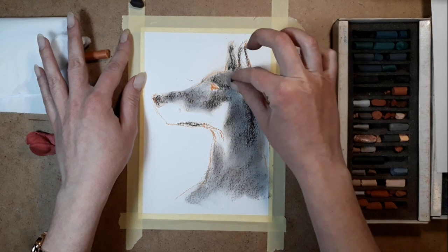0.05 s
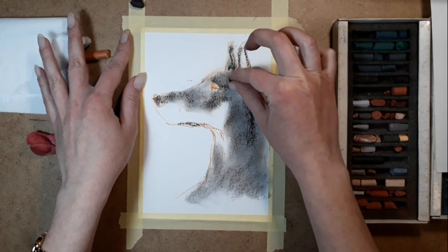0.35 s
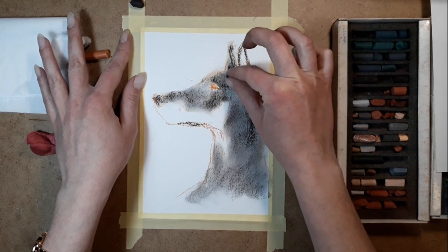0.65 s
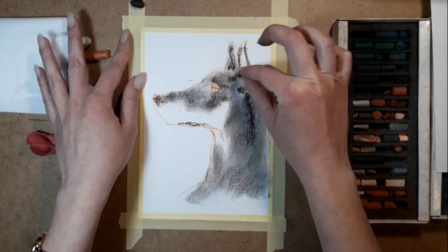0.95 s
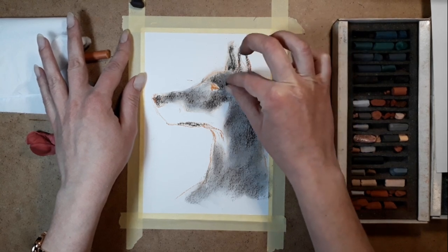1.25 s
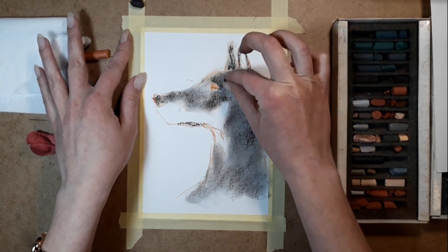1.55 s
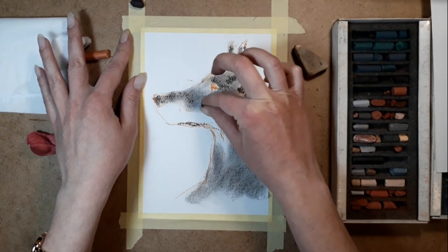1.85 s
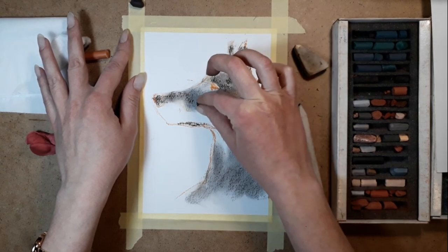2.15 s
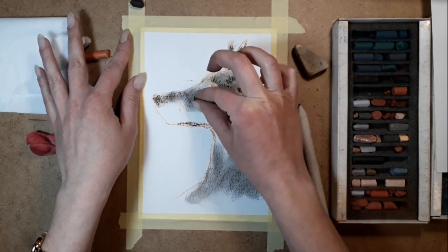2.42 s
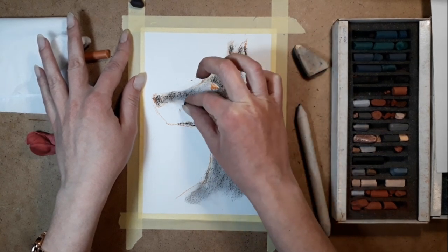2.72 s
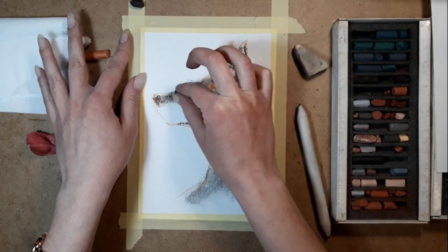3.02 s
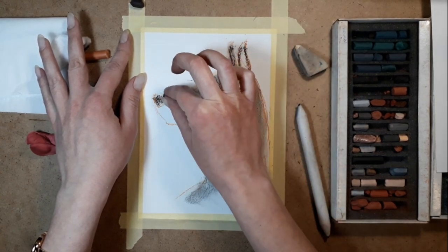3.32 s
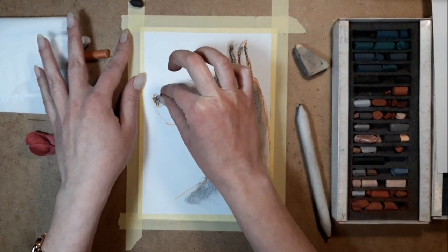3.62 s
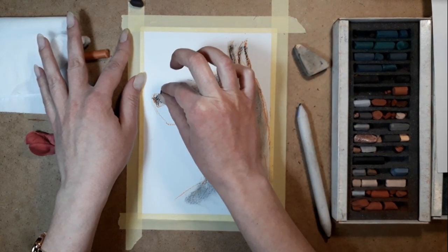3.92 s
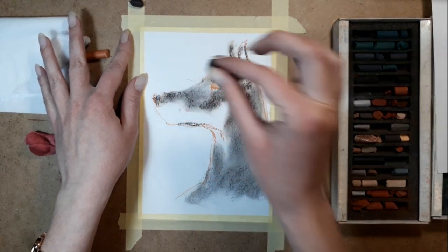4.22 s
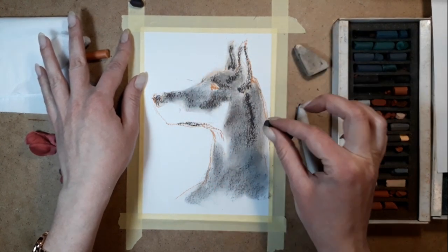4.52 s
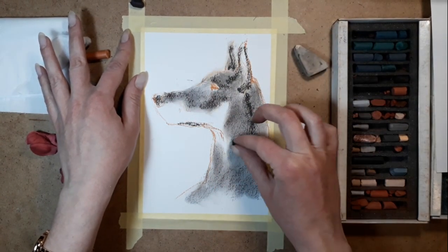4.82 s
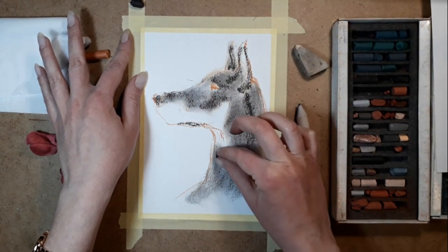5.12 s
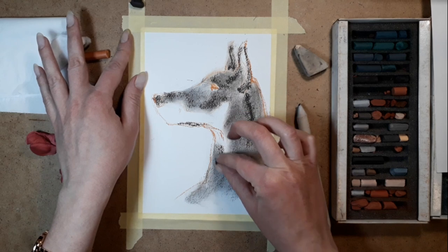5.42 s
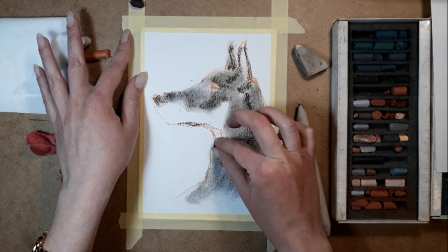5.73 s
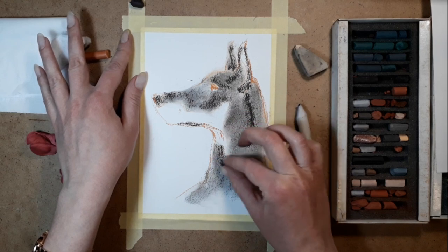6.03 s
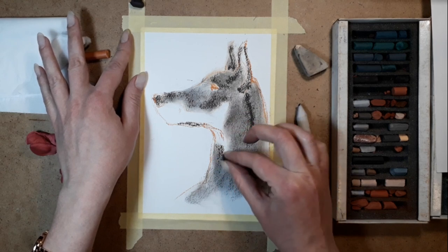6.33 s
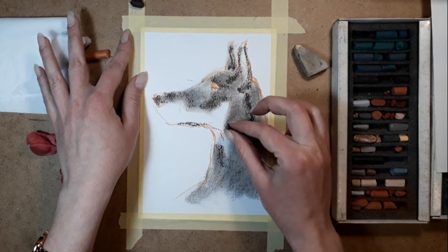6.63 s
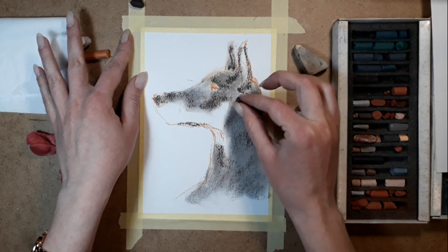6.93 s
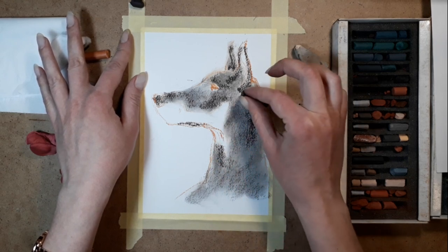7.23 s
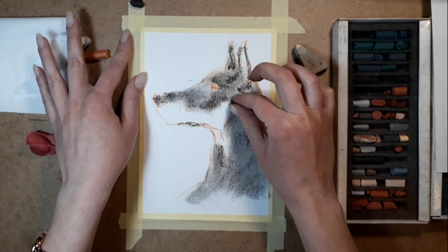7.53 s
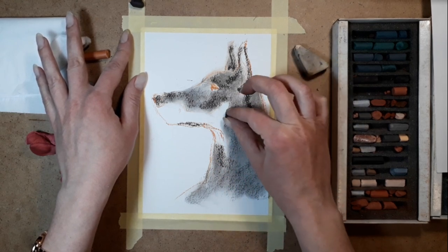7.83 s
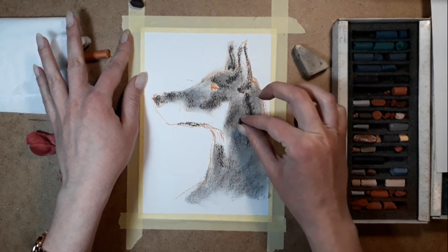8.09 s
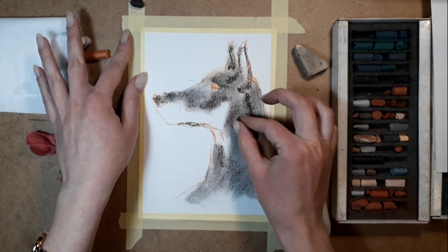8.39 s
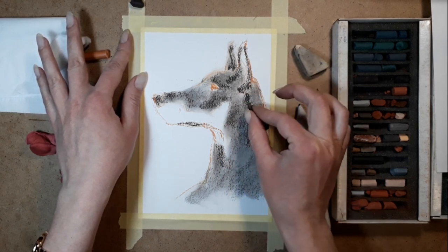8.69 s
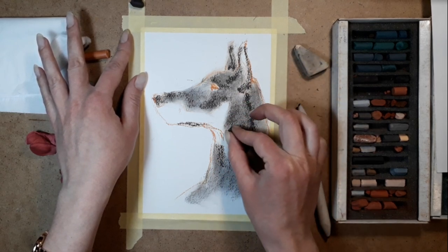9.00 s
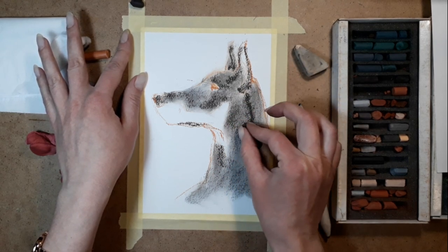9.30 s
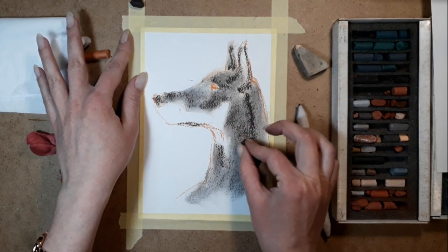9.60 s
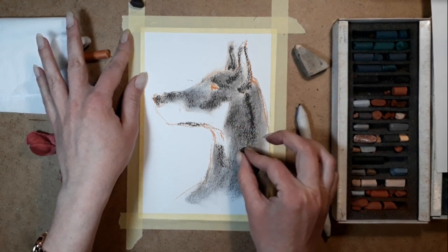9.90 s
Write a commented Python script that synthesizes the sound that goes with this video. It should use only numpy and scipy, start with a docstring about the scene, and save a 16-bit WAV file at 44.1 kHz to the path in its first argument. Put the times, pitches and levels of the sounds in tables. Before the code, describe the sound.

A stub of soft pastel is rubbed in short, quick strokes on rough paper taped to a board, close to the microphone. Each stroke has a dry rasp and a powdery hiss, with occasional light taps and ticks. About halfway through, the strokes get louder and a muffled vehicle accelerates outside, rising in pitch as it draws nearer. The small room hums faintly underneath.

```python
"""Over the faint hum of a small room, a stub of soft pastel is rubbed in short strokes on rough paper
taped to a board. The paper's tooth catches the chalk: the board rasps and crumbling pigment hisses,
with a tap as the stub lands and a tick as its edge breaks. From halfway on the strokes get louder and a
motor vehicle accelerates outside, drawing nearer, its climbing tones swelling on the room's resonances."""
import sys
import numpy as np
from scipy import signal
from scipy.fft import rfft, irfft, next_fast_len
from scipy.io import wavfile
from scipy.ndimage import uniform_filter1d

SR = 44100
rng = np.random.default_rng(int(sys.argv[2]) if len(sys.argv) > 2 else 0)


def put_to_file(sound):
    """Save the sound as 16-bit audio at rate SR, in the file named by the first command-line argument."""
    columns = np.atleast_2d(sound).T  # one column per channel
    safe = np.clip(columns, -1, 1)
    whole_steps = np.round(safe * 32767)
    wavfile.write(sys.argv[1], SR, whole_steps.astype(np.int16))


N = 438794
T = np.arange(N) / SR

# strokes of the chalk: (start [s], length [s], relative rasp level [dB], hiss offset [dB])
STROKES = [(0.18, 0.12, -55.5, -14.5), (0.312, 0.098, -54.5, -14), (0.444, 0.091, -52, -14.5),
           (0.576, 0.078, -55.0, -14), (0.678, 0.09, -55, -12.5), (0.794, 0.09, -51, -10.5),
           (1.166, 0.053, -56, -17), (1.251, 0.092, -56.5, -13.5), (1.37, 0.089, -57, -13),
           (1.476, 0.092, -57, -15), (1.573, 0.1, -54, -16), (1.684, 0.057, -51.5, -10.5),
           (2.033, 0.042, -65.5, -1), (2.077, 0.085, -56, -9.5), (2.184, 0.1, -51, -11),
           (2.298, 0.081, -51.5, -6), (2.747, 0.067, -57.5, -9.5), (2.844, 0.069, -52, -12),
           (2.936, 0.031, -68.5, 10), (3.197, 0.092, -49.5, -14.5), (3.392, 0.074, -56.5, -18),
           (3.531, 0.11, -60.5, -17), (3.661, 0.053, -61, -15), (3.753, 0.065, -63, -18),
           (3.859, 0.05, -56.5, -17), (3.949, 0.06, -60, -15), (4.047, 0.069, -49, -10),
           (4.286, 0.24, -91, 15.5), (4.971, 0.12, -57.5, 8), (5.04, 0.18, -57, -13),
           (5.167, 0.24, -50.0, -12), (5.428, 0.19, -44.5, -7.5), (5.608, 0.22, -46.5, -8.5),
           (5.85, 0.16, -44, -9), (5.988, 0.11, -45.0, -9.5), (6.098, 0.088, -41.5, -11),
           (6.187, 0.092, -45.0, -7), (6.293, 0.07, -46.0, -11), (7.633, 0.14, -56.5, -8.5),
           (7.714, 0.23, -49.5, -14.5), (7.89, 0.142, -51.5, -10), (7.979, 0.13, -43.5, -7.5),
           (8.32, 0.097, -52, -11.5), (8.45, 0.079, -47, -5.5), (8.538, 0.1, -45, -7.5),
           (8.672, 0.092, -41, -7.5), (8.952, 0.086, -51.5, 2), (9.016, 0.077, -44.5, -12.5),
           (9.093, 0.1, -43.5, -9), (9.21, 0.09, -42.5, -10), (9.315, 0.092, -42.5, -10),
           (9.42, 0.11, -43.5, -5), (9.642, 0.1, -45.5, -10), (9.751, 0.068, -47, -10.5),
           (9.834, 0.1, -42, -8)]
# modes of the board with its paper: (frequency [Hz], width [Hz], gain [dB])
BOARD_MODES = [(505, 89, 3), (661, 67, -7), (907, 87, -2), (1158, 59, 3.5), (1342, 64, 9), (1448, 170, 1.5),
               (1695, 126, -1.5), (1995, 84, 1), (2324, 200, -16.5), (2820, 190, -6.5), (3300, 81, -12.5),
               (3650, 170, -25), (4520, 510, -25)]


def rubbing(rasp_db=2.02, hiss_db=2.76):
    """Each stroke speeds up and slows in a half sine; a faster stub meets more fibres, sheds more dust."""
    speed, rasp_power, hiss_power = np.zeros((3, N))
    for start, length, db, hiss_offset_db in STROKES:
        span = slice(int(start * SR), int((start + length) * SR))
        arc = np.sin(np.pi * np.clip((T[span] - start) / length, 0, 1))
        speed[span] = np.maximum(speed[span], arc)
        rasp_power[span] += (arc ** 0.91 * undb(db)) ** 2
        hiss_power[span] += (arc ** 1.14 * undb(db + hiss_offset_db)) ** 2
    slips = catches(1200 + 3500 * speed, spread_db=2.5)
    dust = catches(2500 + 9000 * speed, spread_db=5.5)
    grip = undb(1.1 * walk(110))  # the pressure trembles over the paper's grain
    rasp = steady(board(slips, mode_shares())) * np.sqrt(rasp_power) * undb(rasp_db)
    # hiss of crumbling pigment: (frequency [Hz], relative level [dB])
    crumble_eq = [(1200, -34.5), (2800, -6), (4400, 3), (5700, -0.5), (7300, 7), (8600, 8.5), (9800, -1),
                  (11000, -5.5), (13500, -0.5), (15800, -3.5)]
    hiss = steady(colour(0.83 * slips + dust, crumble_eq)) * np.sqrt(hiss_power) * undb(hiss_db)
    return grip * (rasp + hiss)


def catches(per_second, spread_db):
    """Chalk snags on single paper fibres: many tiny slips, a few big ones."""
    slips = rng.random(N) < per_second / SR
    size = undb(spread_db * np.minimum(rng.standard_normal(N), 2.5))
    return unit(slips * size * rng.choice([-1, 1], N) / np.sqrt(per_second))


def board(push, shares_db):
    """The board rings in its modes, each with its own boost or cut."""
    ring = sum(undb(db + share) * resonate(push, hz, width)
               for (hz, width, db), share in zip(BOARD_MODES, shares_db))
    return signal.sosfilt(signal.butter(2, 6500, fs=SR, output="sos"), ring)


def mode_shares(usual_hiss_db=-9.5, roam_db=4.5):
    """Hissier strokes run on the stub's edge and ring brighter; the spot touched colours every mode."""
    hiss_db, = curves(sorted((start + length / 2, offset) for start, length, _, offset in STROKES))
    tilt = 4 * np.tanh((hiss_db - usual_hiss_db) / 4)  # dB per octave
    # the board booms more at some spots of the drawing: (time [s], gain of the lowest modes [dB])
    boom_curve = [(0, -1.5), (2.3, 3), (3.75, 7), (4.1, -5.5), (6.2, -3.5), (8.7, 3)]
    boom_db, = curves(boom_curve)
    return [tilt * np.clip(np.log2(hz / 1400), -.3, 1.3) + boom_db * (hz < 750) + roam_db * walk(7.9)
            for hz, _, _ in BOARD_MODES]


def taps(contact_hz=1600):
    """A cushioned blow drives only the board's lower modes, with a dull knock from the table below."""
    # the stub or a fingertip knocks the board: (time [s], relative level [dB])
    blows = [(1.1788, -40), (2.05, -45.5), (2.7219, -42), (2.7252, -30.5), (3.239, -44), (4.09, -47),
             (5.635, -44), (5.9236, -48), (5.935, -46)]
    push = np.zeros(N)
    for s, db in blows:
        push[int(s * SR)] += undb(db)
    push = signal.sosfilt(signal.butter(4, contact_hz, fs=SR, output="sos"), push)
    ring = board(push, np.zeros(len(BOARD_MODES))) * undb(30)
    knock = resonate(push, hz=720, width=500) * undb(28.5)
    return ring + knock


def ticks(width_hz=3200):
    """A brief crunch as an edge of the chalk breaks."""
    # the hard edge clicks on the paper: (time [s], relative level [dB], centre [Hz], decay [s])
    clicks = [(0.118, -57, 5900, 0.0034), (1.166, -55.5, 7000, .004), (1.543, -48, 3770, 0.0016),
              (2.037, -62, 7000, .005), (2.711, -47, 5440, 0.0024), (3.166, -56, 7000, 0.0043),
              (3.201, -45, 6660, 0.0098), (4.101, -42.5, 7000, 0.0018), (4.983, -44.5, 5800, 0.01),
              (5.623, -48, 4000, 0.0017), (7.278, -48, 3900, 0.0025), (7.30, -52.5, 3800, 0.0026),
              (8.305, -54, 5997, 0.0048), (8.964, -37.5, 5400, 0.0063), (9.651, -41, 5700, .004)]
    out = np.zeros(N)
    age = T[:SR // 10]
    for s, db, hz, decay in clicks:
        burst = rng.standard_normal(len(age)) * np.exp(-age / decay)
        crunch = resonate(resonate(burst, hz, width_hz), hz, width_hz)
        start = int(s * SR)
        out[start:start + len(age)] += undb(db) * 2 * crunch
    return out


def room(x, t60=0.39, wet_db=-10, dull_hz=3000):
    """The hands, small as they are, throw back only treble; nearby walls add a short, dull tail."""
    # short echoes off the hands: (delay [s], gain [linear])
    bounces = [(.0009, 0.41), (.0021, -.28), (.0034, .25)]
    age = T[:SR // 2]
    tail = rng.standard_normal(len(age)) * np.exp(-np.log(1000) * age / t60) * (age > .004)
    tail = signal.lfilter(*signal.butter(1, dull_hz, fs=SR), tail / np.linalg.norm(tail))
    treble = signal.lfilter(*signal.butter(2, 3500, "high", fs=SR), x)
    early = sum(gain * np.interp(T - delay, T, treble, left=0) for delay, gain in bounces)
    return undb(-1.65) * (x + early) + undb(wet_db) * signal.fftconvolve(x, tail)[:N]


def vehicle(engine_db=-39.5, roar_db=-50):
    """A vehicle revs up as it draws near: engine tones over a dull roar."""
    # engine speed: (time [s], firing rate [Hz])
    revs = [(4.8, 89.9), (5.5, 105.2), (6.0, 118.2), (6.5, 129.4), (7.0, 139.6), (7.6, 151.9), (8.3, 167.4),
            (8.9, 188.8), (9.5, 208), (9.95, 231.6)]
    # nearness of the vehicle: (time [s], gain [dB])
    approach = [(4.7, -41), (5.3, -18), (5.7, -8), (6.2, -6.5), (7.3, -6.5), (7.7, -6), (8.2, -2.5),
                (8.9, 0), (9.95, 6.5)]
    # load on the engine, heard in the strength of its tones: (time [s], gain [dB])
    load = [(4.8, 3), (5.3, 4), (5.8, 2), (7.45, -1), (7.65, 7.5), (7.95, -0.5), (8.9, 2), (9.95, -2)]
    rate, = curves(revs)
    near_db, = curves(approach)
    load_db, = curves(load)
    phase = 2 * np.pi * np.cumsum(rate * (1 + 0.0044 * walk(19.5))) / SR
    tones = engine_tones(rate, phase) * undb(engine_db + load_db)
    roar = street_roar(phase) * undb(roar_db + 2.0 * walk(3.99))
    return undb(near_db) * (tones + roar)


def engine_tones(rate, phase, blur_hz=1100, least_blur=0.23, waver_db=2.2):
    """Engine orders climb through the room's resonances; street echoes blur the higher ones most."""
    # engine orders: (multiple of the firing rate, relative level [dB])
    orders = [(1, -2), (1.5, -12.5), (2, -4), (2.5, -16), (3, -8.5), (3.5, -18), (4, -11), (4.5, -13),
              (5, -13.5)]
    tones = 0
    for order, db in orders:
        blur = least_blur + order * rate / blur_hz
        echoes = (1 + blur * (walk(26.2) + 1j * walk(34))) / np.sqrt(1 + 2 * blur ** 2)
        tone = np.sqrt(2) * np.real(echoes * np.exp(1j * (order * phase + 2 * np.pi * rng.random())))
        tones = tones + tone * undb(db + waver_db * walk(4.8)) * room_gain(order * rate)
    return tones


def room_gain(pitch, floor_db=-14.5):
    """How strongly the room answers a tone from outside: loud on a resonance, weak between them."""
    # room resonances: (frequency [Hz], width [Hz], gain [dB])
    room_modes = [(128.3, 5.9, 4), (139, 4.3, 2.5), (148.5, 9.3, -1), (172.8, 11, 4), (188.7, 3.5, 3),
                  (209.2, 23.5, 0.5), (240, 51, -5.5), (281.8, 25.7, 5), (304.9, 7.7, 6.5),
                  (313.4, 16.6, 5.5), (385, 26.8, 4.5), (438, 41, -8.5), (484, 18, -2), (626, 26, -8.5)]
    f = np.arange(1500.)
    power = sum((undb(db) / (1 + (2 * (f - hz) / width) ** 2)) ** 2 for hz, width, db in room_modes)
    return np.interp(pitch, f, np.sqrt(power + undb(floor_db) ** 2))


def street_roar(phase):
    """Exhaust and road noise, pulsing with each firing and muffled by the walls."""
    # the roar as heard indoors: (frequency [Hz], relative level [dB])
    roar_eq = [(60, -26), (120, -15.5), (200, -2.5), (400, -1.5), (520, -8.5), (750, -16), (1050, -14),
               (1250, -16.5), (1500, -22.5), (2600, -29), (4500, -38), (9000, -44.5)]
    # resonances of the path from the street: (frequency [Hz], width [Hz], gain [dB])
    leaks = [(896, 100, -1.5), (1917, 42, 7)]
    pulsing = rng.standard_normal(N) * (1 + .5 * np.sin(phase))
    roar = unit(colour(pulsing, roar_eq))
    return roar + sum(undb(db) * resonate(roar, hz, width) for hz, width, db in leaks)


def room_tone():
    """Low room noise and a wavering appliance hum."""
    # the still room: (frequency [Hz], relative level [dB])
    air_eq = [(15, -76.5), (25, -46.5), (59, -10.5), (93, -13.5), (198, -5.5), (260, -10.5), (313, -1.5),
              (399, -20), (433, -14), (523, -20), (684, -20.5), (1240, -24.5), (1380, -26), (2120, -31),
              (7000, -40.5), (15500, -44)]
    # appliance hum: (frequency [Hz], level [dB])
    hum_tones = [(70, -73), (204.6, -71.5), (312.2, -67)]
    air = unit(colour(rng.standard_normal(N), air_eq)) * undb(-57.5 + .5 * walk(2.7))
    hum = 0
    for hz, db in hum_tones:
        level = undb(db) * (1 + .5 * walk(8.1))
        hum = hum + level * np.sqrt(2) * np.sin(2 * np.pi * hz * T + 1.18 * walk(9.7))
    return air + hum


def undb(db):
    """Decibels to gain."""
    return 10 ** (np.asarray(db) / 20)


def unit(x):
    """Scale to rms 1."""
    return x / np.sqrt(np.mean(x ** 2))


def steady(x, seconds=0.076):
    """Hold the short-term rms at 1, keeping the grain."""
    return x / np.sqrt(uniform_filter1d(x ** 2, int(seconds * SR)) + 1e-12)


def curves(table):
    """The columns of a timed table, joined by straight lines."""
    s, *columns = np.transpose(table)
    return [np.interp(T, s, c) for c in columns]


def walk(rate):
    """Smooth random drift with rms 1, changing about rate times a second."""
    window = max(int(SR / rate), 2)
    drift = uniform_filter1d(rng.standard_normal(N), window, mode="wrap")
    return unit(uniform_filter1d(drift, window, mode="wrap"))


def colour(x, points):
    """Minimum-phase EQ through the points (frequency [Hz], gain [dB])."""
    hz, db = np.transpose(points)
    size = next_fast_len(N + SR // 2, True)
    f = np.maximum(np.arange(size // 2 + 1) * SR / size, 1)
    gain = undb(np.interp(np.log(f), np.log(hz), db))
    cepstrum = irfft(np.log(gain), size)
    cepstrum[1:size // 2] *= 2
    cepstrum[size // 2 + 1:] = 0
    return irfft(rfft(x, size) * np.exp(rfft(cepstrum)), size)[:N]


def resonate(x, hz, width):
    """One resonance, gain 1 at its centre."""
    return signal.lfilter(*signal.iirpeak(min(hz, .45 * SR), hz / width, fs=SR), x)


def scene():
    """The drawing up close, the street beyond the walls, room tone underneath; mono."""
    drawing = room(rubbing() + taps() + ticks())
    return (drawing + vehicle() + room_tone())[None]


def record(dry):
    """The microphone has a broad dip in the high treble; the recorder cuts the top."""
    voiced = dry - (1 - undb(-6.5)) * resonate(dry, hz=10650, width=2800)
    return signal.sosfilt(signal.ellip(12, .1, 80, 15750, fs=SR, output="sos"), voiced)


dry = scene()
out = record(dry)
put_to_file(out)
```